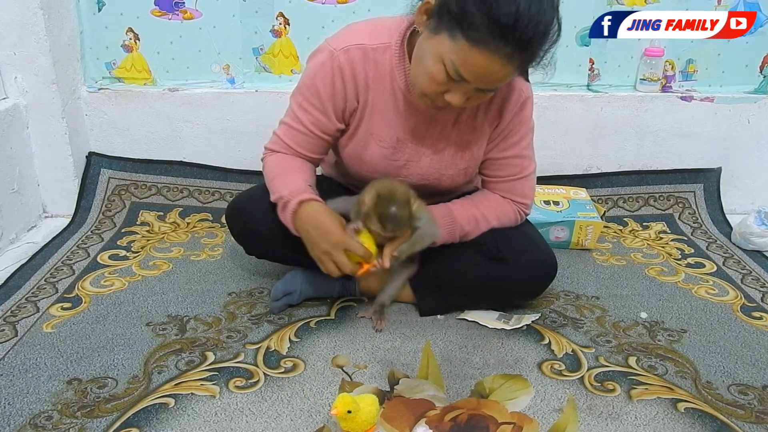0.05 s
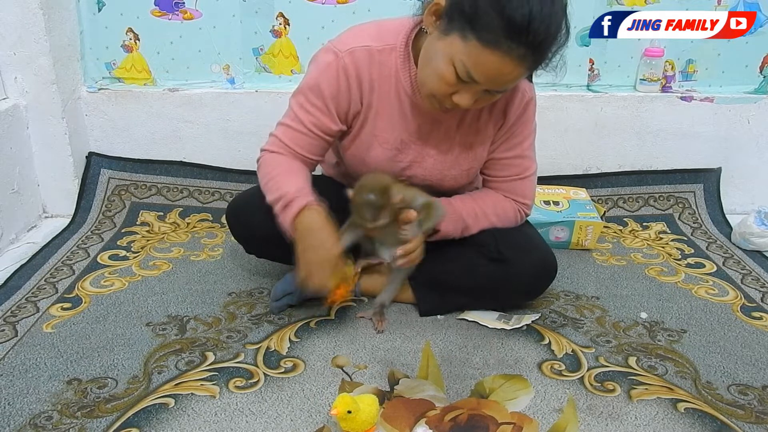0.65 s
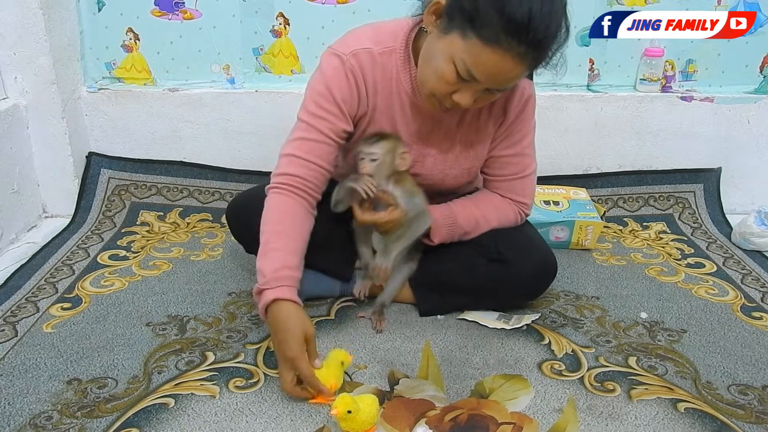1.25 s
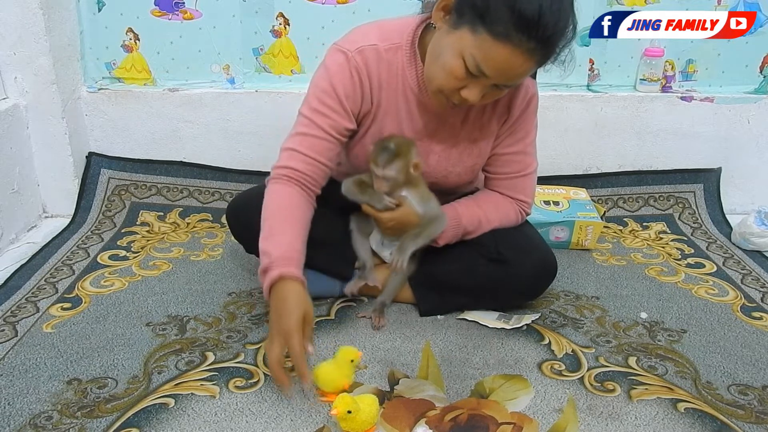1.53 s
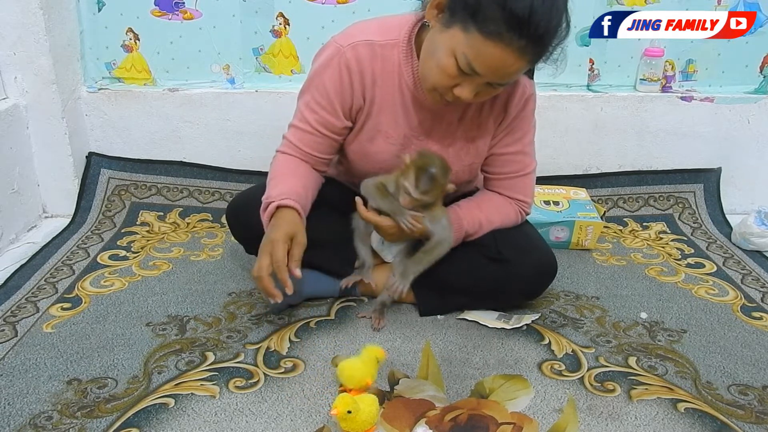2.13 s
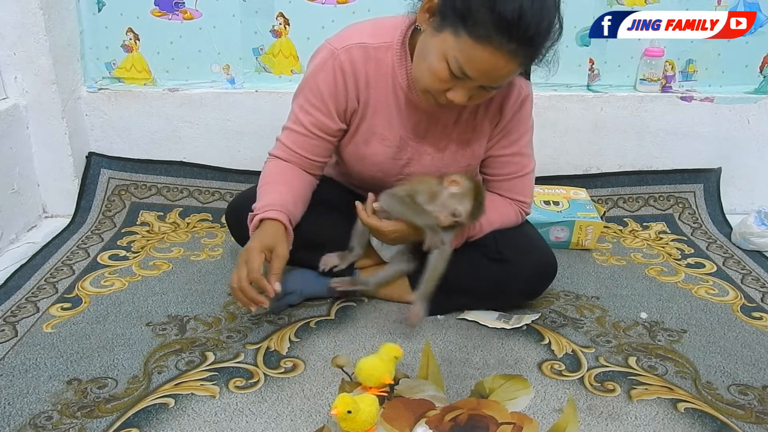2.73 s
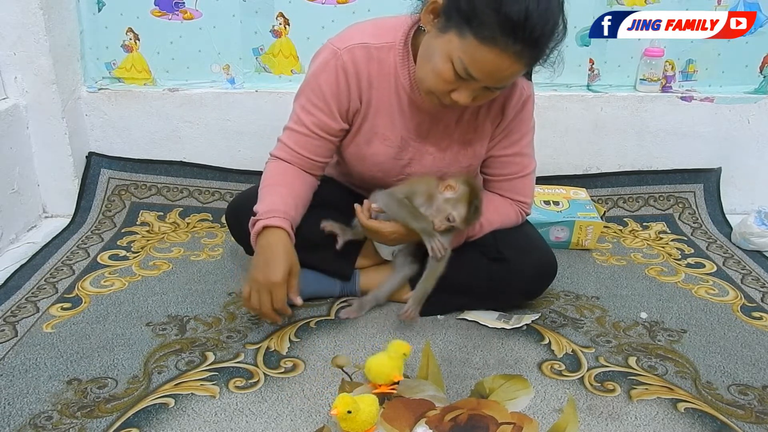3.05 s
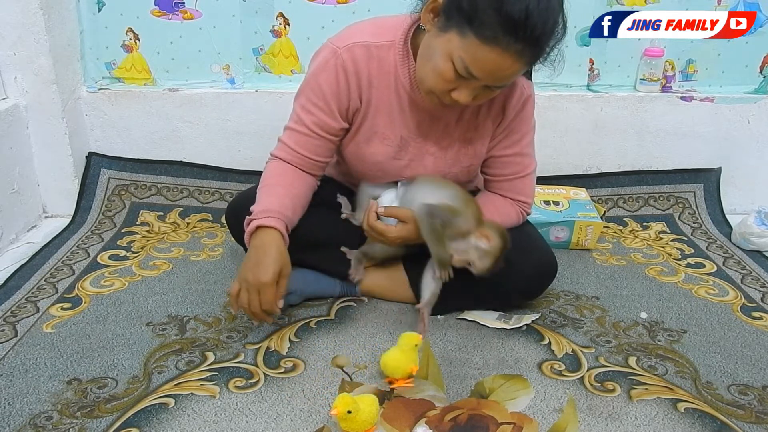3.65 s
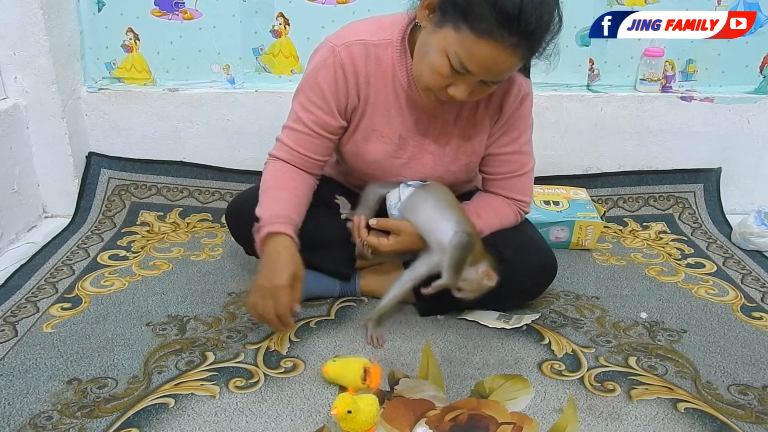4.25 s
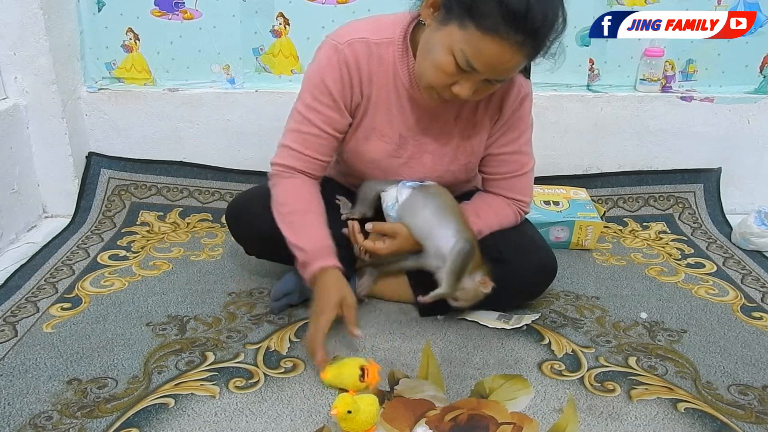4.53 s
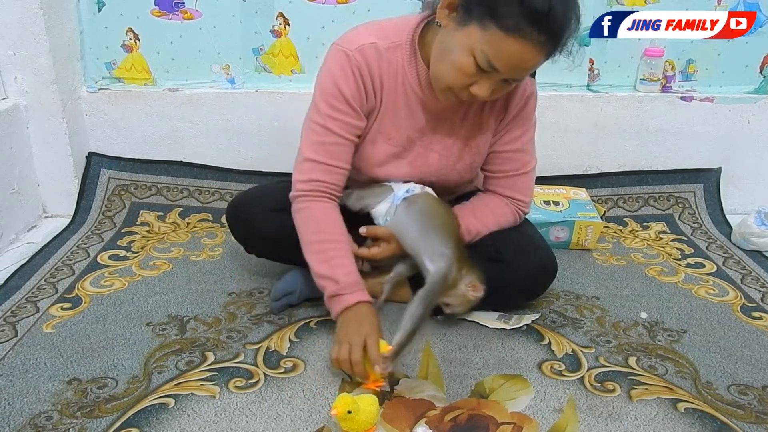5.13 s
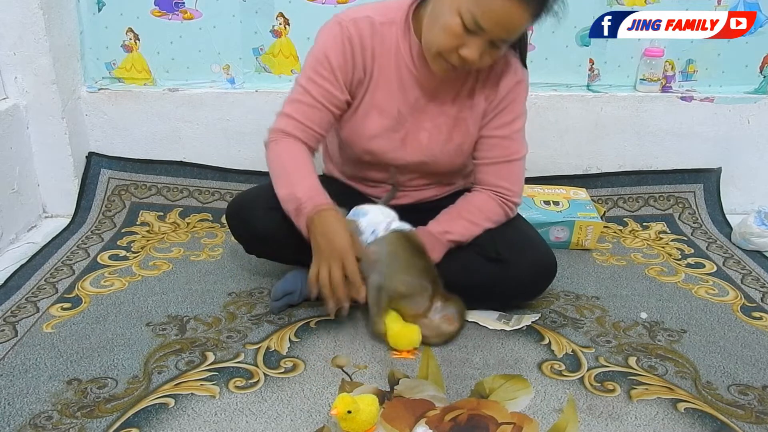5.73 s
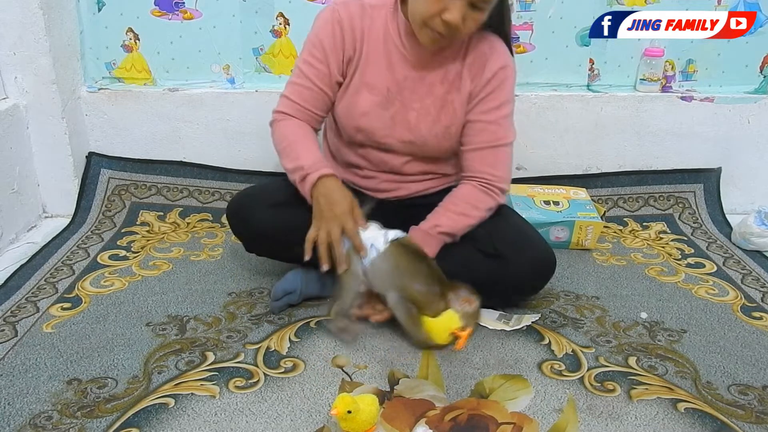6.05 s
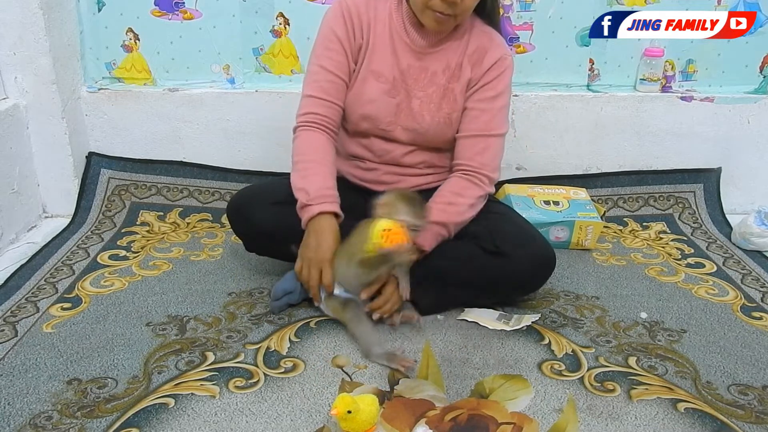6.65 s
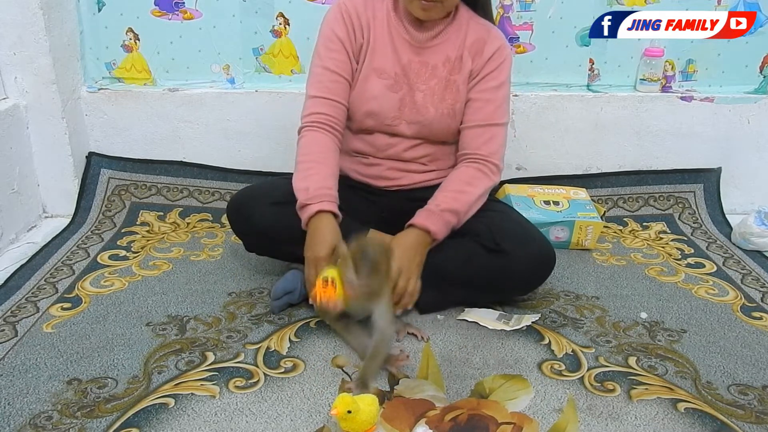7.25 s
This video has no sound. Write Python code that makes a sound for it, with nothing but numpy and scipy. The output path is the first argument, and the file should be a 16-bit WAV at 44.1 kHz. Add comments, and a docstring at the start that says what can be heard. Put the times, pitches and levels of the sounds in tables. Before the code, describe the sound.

A faint low rumble and hiss fill a small, hard-walled room throughout. In the first second, fingers tap lightly on a plastic wind-up chick and sleeves brush softly. One sharp snap comes at about 1.1 seconds, then two small knocks as the toy is set down. From 1.5 to 4 seconds it hops on the carpet with an even run of crisp double clicks, about six pairs a second, slightly left of centre, each ringing briefly in the room. It topples with a soft knock at about 4.1 seconds. After a brush of cloth, the handled toy lets out irregular single snaps from 5 to 6.1 seconds, followed by light knocks. A few faint hollow pops are scattered between 2 and 6.2 seconds. From 6.2 seconds clothes rustle in short strokes, with one loud snap at 7 seconds and a last small tap just after.

```python
"""Wind-up chick on a carpet

A plastic wind-up chick is set down and hops until it topples: twice a hop its spring snaps the legs
against the shell, and each impact sets toy and room ringing. Picked up and handled, it lets go
single snaps among small ticks, soft pops and the friction noise of clothes. A small hard-walled room
reflects every click, over a low rumble and faint hiss."""
import sys
import numpy as np
from scipy import signal
from scipy.fft import rfft, irfft, next_fast_len
from scipy.io import wavfile
from scipy.ndimage import uniform_filter1d, map_coordinates

SR = 44100
rng = np.random.default_rng(int(sys.argv[2]) if len(sys.argv) > 2 else 0)


def pcm_store(signal):
    """Save signal as 16-bit PCM."""
    levels = np.round(np.clip(np.atleast_2d(signal), -1, 1) * 32767)
    wavfile.write(sys.argv[1], SR, levels.astype(np.int16).T)


N = 329856
ROOM_SAMPLES = SR // 3


def amp(db):
    """Amplitude ratio of a level in decibels."""
    return 10 ** (np.asarray(db) / 20)


def unit(x):
    """Normalisation to rms 1."""
    return x / np.sqrt(np.mean(x ** 2) + 1e-20)


def along(points, hz):
    """Interpolation of (f/Hz, value) points on a logarithmic frequency axis."""
    f, values = np.transpose(points)
    return np.interp(np.log(hz + 1), np.log(f + 1), values)


def wobble(rate):
    """Smooth random modulation with rate knots a second."""
    return map_coordinates(rng.standard_normal(int(N * rate / SR) + 4), [np.arange(N) * rate / SR])


def filtered(x, response):
    """Linear filtering: the spectrum of x times a frequency response."""
    n = x.shape[-1]
    m = next_fast_len(n + 4096)
    return irfft(rfft(x, m) * response(np.fft.rfftfreq(m, 1 / SR)), m)[..., :n]


def add(out, s, x):
    """Superposition of x on out from time s."""
    part = out[:, max(round(s * SR), 0):][:, :x.shape[-1]]
    part += x[..., :part.shape[-1]]


# Width of the diffuse field: f/Hz, side level re mid/dB
SIDE_LEVEL = [(30, -30), (70, -16.5), (140, -8.5), (230, -4.5), (1200, -9.5), (2500, -7), (5000, -6),
              (8000, -0.5), (15000, 2)]

def diffuse(size):
    """A diffuse field of white noise: coherent at two points in the bass, unrelated in the treble."""
    def mid_and_side(hz):
        share = amp(along(SIDE_LEVEL, hz))
        return np.array([np.ones_like(hz), share]) / np.hypot(1, share)
    mid, side = filtered(rng.standard_normal((2, size)), mid_and_side)
    return np.array([mid + side, mid - side])


def coloured_noise(spectrum):
    """Spectral shaping of diffuse noise, at rms 1."""
    return unit(filtered(diffuse(N), lambda hz: amp(along(spectrum, hz))))


# Spectra of the room's rumble and hiss: f/Hz, relative level/dB
RUMBLE_SPECTRUM = [(20, -52), (36, -31), (44, -8), (52, 6.5), (63, -14.5), (78, 2.5), (92, -5.5),
                   (108, -14.5), (140, -24), (300, -35.5)]
HISS_SPECTRUM = [(100, -34), (160, -1.5), (400, -7.5), (900, -9), (2300, -10.5), (3700, -15), (4600, -12),
                 (7200, -11), (9000, -20), (15500, -44)]

def background(rumble_db=-69, hiss_db=-67.5):
    """Stationary noise: a low rumble and a faint hiss."""
    rumble = amp(rumble_db) * coloured_noise(RUMBLE_SPECTRUM)
    return rumble + amp(hiss_db) * coloured_noise(HISS_SPECTRUM)


# Reverberation time: f/Hz, T60/s
DECAY_TIMES = [(250, 0.17), (1000, 0.27), (2500, 0.24), (6500, 0.19), (10000, 0.19), (15000, 0.097)]
# Early reflections: delay/s, relative level/dB
ECHOES = [(.0026, -3), (.0055, -9.5), (.011, -5), (0.0126, -4.5), (.0152, -15.5), (0.0215, -10)]
# Direct sound at the two microphone ports: f/Hz, phase difference/rad
PORT_PHASE = [(3000, 0.24), (7200, -0.5), (8000, -1.95), (13000, -1.2), (15000, -1.5)]

def in_room(x, walls, tail_db, early_db=-6, build_s=0.014, smear_s=0.00076, steady_hz=2500):
    """Reverberation: direct sound, early reflections, then an exponentially decaying tail."""
    t = np.arange(ROOM_SAMPLES) / SR
    # small moves of the source change only the treble of the reflection pattern
    steady = lambda hz: 1 / np.hypot(1, hz / steady_hz)
    changing = filtered(diffuse(ROOM_SAMPLES), lambda hz: np.sqrt(1 - steady(hz) ** 2))
    hz, frames, pattern = signal.stft(filtered(walls, steady) + changing, SR, nperseg=128)
    decay = amp(-60 * frames / along(DECAY_TIMES, hz)[:, None])
    tail = signal.istft(pattern * decay, SR, nperseg=128)[1][:, :ROOM_SAMPLES]
    response = amp(tail_db) * unit(tail * np.where(t < build_s, amp(early_db), 1))  # thin at first
    scatter = diffuse(ROOM_SAMPLES)
    for delay, db in ECHOES:
        window = np.exp(-((t - delay - rng.normal(0, 0.00088)) / smear_s) ** 2)
        response += amp(db) * unit(scatter * window)
    direct = filtered(x, lambda hz: np.exp(.5j * along(PORT_PHASE, hz) * np.array([[1], [-1]])))
    reflected = signal.fftconvolve(x[None], response / np.sqrt(ROOM_SAMPLES), axes=1)
    return reflected + np.pad(direct, ((0, 0), (0, reflected.shape[1] - len(x))))


# Friction spectra of fibres and of heavy cloth: f/Hz, relative level/dB
FIBRE_SPECTRUM = [(300, -2), (1400, -19), (2500, -10), (3600, -5), (4500, -1.5), (6600, 4), (7500, 1),
                  (8500, -8.5), (10500, -20), (15000, -38)]
RUB_SPECTRUM = [(100, -25), (300, -12.5), (750, 0), (1500, 4.5), (2500, 5), (4000, -16), (10000, -36)]
# Sleeves and fur sliding over cloth: t/s, half length/s, relative hiss level/dB, relative rub level/dB
CLOTH_STROKES = [(0.562, 0.075, -61.5, -70.5), (1, 0.053, -65, -68.5), (4.83, 0.21, -66, -69.5),
                 (6.214, .11, -58.5, -79.5), (6.48, 0.064, -59.5, -66.5), (6.654, 0.12, -65, -77),
                 (6.873, 0.066, -61.5, -65), (7.088, 0.1, -62, -65), (7.427, 0.064, -71, -74)]

def clothes(rub_db=-1, grain_db=0.7):
    """Friction noise swells and fades: fibres hiss with an uneven grain, heavier cloth rubs dully."""
    t = np.arange(N) / SR
    hiss_power, rub_power = np.zeros((2, N))
    for s, half, bright_db, dull_db in CLOTH_STROKES:
        swell = np.exp(-((t - s) / half) ** 2)
        hiss_power += amp(bright_db) ** 2 * swell
        rub_power += amp(dull_db + rub_db) ** 2 * swell
    grain = unit(amp(grain_db * wobble(250) + 1.05 * wobble(35)))
    hiss = np.sqrt(hiss_power) * coloured_noise(FIBRE_SPECTRUM)
    rub = np.sqrt(rub_power) * coloured_noise(RUB_SPECTRUM)
    return grain * (hiss + rub)


# Soft hollow pops: t/s, relative level/dB, f/Hz
POP_TONES = [(2.085, -51.5, 300), (3.50, -57.5, 296), (4.262, -61.5, 287), (4.961, -52, 275),
             (5.431, -55.5, 272), (5.433, -60, 467), (6.173, -50.5, 448)]

def pops(level_db=2, t60=0.034, attack_s=0.0019):
    """Damped oscillation: a few cycles of one low tone, each from its own place in the room."""
    out, t = np.zeros((2, N)), np.arange(SR // 10) / SR
    for s, db, hz in POP_TONES:
        tone = np.sin(2 * np.pi * hz * t) * amp(-60 * t / t60) * (1 - np.exp(-t / attack_s))
        add(out, s, amp(db + level_db) * in_room(2 * tone, diffuse(ROOM_SAMPLES), tail_db=-2))
    return out


def resonance(hz, centre_hz, width_hz, db):
    """A Lorentzian resonance: its lift in dB above a flat response."""
    return 10 * np.log10(1 + amp(db) ** 2 / (1 + (2 * (hz - centre_hz) / width_hz) ** 2))


def shell_band(hz):
    """Radiation band of the hollow shell, as a weight from 1 to 0."""
    return np.interp(hz, [2800, 3800], [1, 0])


# Spectral envelope of the struck plastic: f/Hz, relative level/dB
PLASTIC_SPECTRUM = [(150, -29.5), (400, -14.5), (1000, -12.5), (2300, -7), (2800, -7.5), (3600, -13),
                    (4300, -7.5), (5200, -6), (6000, -1.5), (7300, -2), (8200, -10), (9500, -20),
                    (13300, -28), (15500, -48)]
# Steady ringing tones of the toy and room, heard in every click: f/Hz, bandwidth/Hz, strength/dB
STEADY_RINGS = [(674, 19, 3), (897, 7.6, 10.5), (1074, 48, 7.5), (1485, 43, 2.5), (1440, 20, -13),
                (2410, 17, 1), (4850, 37, -19), (6100, 110, -23), (6800, 57, 5.5), (10240, 180, 3)]

def strike(colour_db, contact_s, slip_db=-18, size=4096):
    """Impact excitation: a slip, then a brief chattering contact sets toy and room ringing."""
    t, hz = np.arange(size) / SR, np.fft.rfftfreq(size, 1 / SR)
    slip = amp(slip_db) * np.exp(-(t / contact_s) ** 2)
    blow = np.exp(-((t - 2 * contact_s) / contact_s) ** 4)
    chatter = rfft(rng.standard_normal(size) * (slip + blow))
    power = np.abs(uniform_filter1d(np.abs(chatter) ** 2, size=40))
    chatter /= np.sqrt(power + 1e-9)  # the contact itself is broadband
    steady_db = along(PLASTIC_SPECTRUM, hz) + sum(resonance(hz, *ring) for ring in STEADY_RINGS)
    cepstrum = irfft(np.log(amp(steady_db + colour_db(hz)) + 1e-6))
    causal = np.r_[1, np.full(size // 2 - 1, 2), np.zeros(size // 2)]
    minimum_phase = np.exp(rfft(cepstrum * causal))
    fade = np.minimum(1, 2 * (1 - t / t[-1])) ** 2
    return fade * irfft(chatter * minimum_phase)


# Knocks of fingers and carpet on the toy: t/s, relative level/dB, relative shell level/dB, shell f/Hz
KNOCKS = [(0.276, -47.5, -14, 1440), (0.6882, -48.5, -9, 1500), (1.2528, -51.5, -8.5, 3100),
          (1.288, -54, -21, 820), (4.125, -41.5, -8, 760), (4.156, -48, -13, 2150),
          (4.96, -47, -16.5, 2220), (5.434, -50.5, -11, 2200), (6.039, -45, -5.5, 1390),
          (6.173, -47.5, -4.5, 1420), (6.284, -45, -14.5, 2840), (6.315, -42.5, -11, 2280),
          (7.25, -47.5, -18, 1390)]

def handling(walls, level_db=21, shell_boost_db=7):
    """Soft impacts: longer contacts excite the same plastic."""
    out = np.zeros((2, N))
    for s, db, shell_db, shell_hz in KNOCKS:
        def colour(hz):
            band = (shell_db + shell_boost_db) * shell_band(hz)
            return band + resonance(hz, shell_hz, width_hz=440, db=13)
        knock = in_room(strike(colour, contact_s=0.00105), walls, tail_db=3)
        add(out, s - .001, amp(db + level_db) * knock)
    return out


USUAL_SNAP_DB = -29  # relative level of an ordinary snap

def snap(walls, db, modes, shell_db, crisp_db, crisp_slope=.55, hard_snap_db=-22.5):
    """Release of elastic energy: the spring snaps the legs against the shell, which resonates."""
    # up to a hard snap, the crack of the catch varies less than the body
    top_db = crisp_db - crisp_slope * (min(db, hard_snap_db) - USUAL_SNAP_DB)
    def colour(hz):
        bands = shell_db * shell_band(hz) + top_db * np.interp(hz, [7500, 9500], [0, 1])
        return bands + sum(resonance(hz, *mode) for mode in modes)
    return amp(db) * in_room(strike(colour, contact_s=0.000722), walls, tail_db=2, early_db=-6.5)


# Snaps in the hand: t/s, relative level/dB, shell level/dB, shell f/Hz, its strength/dB,
# frame f/Hz, its strength/dB, gear f/Hz
HELD_SNAPS = [(1.0786, -25.5, -8, 1980, 10, 4460, 9, 7060),
              (5.0297, -30, -6.5, 1990, 17.5, 6530, 9.5, 7700), (5.1403, -29, -4, 2120, 9.5, 4870, 3, 7540),
              (5.538, -30, -4, 1690, 11.5, 4400, 6, 7200), (5.676, -33, -2, 870, 3, 5200, 9, 7800),
              (5.7595, -29.5, -3.5, 744, 4.5, 5100, 5, 7300), (5.854, -28, -2, 553, 7, 5130, 5, 7780),
              (5.914, -29.5, -2.5, 740, 2.5, 5760, 6.5, 7500),
              (6.0696, -27, -3.5, 1350, 7.5, 5100, 8, 7900), (6.982, -22.5, -7.5, 1430, 4, 4690, 8, 7700)]

def held_clockwork(walls, level_db=21, crisp_db=4.5, width_hz=236, gear_width_hz=170, gear_db=6.5):
    """Loading by the hand: the grip shifts the resonances as the spring lets go single snaps."""
    out = np.zeros((2, N))
    for s, db, shell_db, shell_hz, shell_mode_db, frame_hz, frame_db, gear_hz in HELD_SNAPS:
        modes = [(shell_hz, width_hz, shell_mode_db), (frame_hz, width_hz, frame_db),
                 (gear_hz, gear_width_hz, gear_db)]
        add(out, s - .0003, amp(level_db) * snap(walls, db, modes, shell_db, crisp_db))
    return out


# Gear resonance, shifting as the toy turns: t/s, f/Hz
GEAR_PITCH = [(1.5, 7360), (2.4, 6890), (2.9, 7350), (4, 7640)]

def varied(modes, s, db, gear_width_hz=200, gear_db=3, growth=1.2, detune=0.018, scatter_db=3):
    """Modal excitation varies: stronger for a hard snap, and scattered in pitch and strength."""
    gear_mode = (np.interp(s, *np.transpose(GEAR_PITCH)), gear_width_hz, gear_db)
    extra_db = growth * (db - USUAL_SNAP_DB)
    return [(hz * (1 + detune * rng.normal()), width, strength + extra_db + scatter_db * rng.normal())
            for hz, width, strength in modes + [gear_mode]]


# Modes rung by the kick and by the return of the legs: f/Hz, bandwidth/Hz, relative strength/dB
KICK_MODES = [(1410, 390, 2), (2203, 170, 2), (4350, 1000, -1), (5780, 200, 4)]
RETURN_MODES = [(1890, 71, 2.5), (3300, 260, -0.5), (4277, 450, 3), (5400, 220, -8)]
# Radiation of the shell during the run: t/s, relative level/dB
SHELL_RADIATION = [(1.5, -1), (2.4, 0.5), (4, -2.5)]
# Hops: kick t/s, delay of the return/s, relative kick level/dB, relative return level/dB
HOP_IMPACTS = [(1.5005, .0461, -28.5, -28.5), (1.642, .0555, -29, -28), (1.7893, .0589, -29, -29),
               (1.9476, 0.06, -28.5, -27.5), (2.1101, .0617, -29, -29), (2.275, 0.062, -28.5, -29),
               (2.4393, 0.06, -30, -29.5), (2.603, .06, -29, -29.5), (2.7712, .0578, -30, -28.5),
               (2.9375, 0.056, -30, -29.5), (3.1046, .0554, -29.5, -30), (3.2684, 0.053, -29.5, -28),
               (3.4329, 0.053, -29, -27.5), (3.6061, 0.054, -29, -28.5), (3.7663, 0.058, -29, -29.5),
               (3.9322, 0.045, -29, -30)]

def hopping_clockwork(walls, level_db=20.5, crisp_db_per_s=0.5):
    """A nearly periodic train of impact pairs: the legs kick, then spring back."""
    out = np.zeros((2, N))
    for s, delay, kick_db, return_db in HOP_IMPACTS:
        shell_db = np.interp(s, *np.transpose(SHELL_RADIATION))
        rise_db = crisp_db_per_s * (s - HOP_IMPACTS[0][0])  # crisper as the spring unwinds
        modes = varied(KICK_MODES, s, kick_db)
        kick = snap(walls, kick_db, modes, shell_db - 2, crisp_db=4.5 + rise_db)
        modes = varied(RETURN_MODES, s, return_db)
        rebound = snap(walls, return_db, modes, shell_db - 3, crisp_db=4 + rise_db)
        add(out, s - .0003, amp(level_db) * kick)
        add(out, s + delay - .0003, amp(level_db) * rebound)
    return out


def scene():
    """Superposition: the toy, a little left of centre, sends all its clicks to the same walls."""
    walls = diffuse(ROOM_SAMPLES)
    toy = hopping_clockwork(walls) + held_clockwork(walls) + handling(walls)
    return (toy + clothes()) * amp([[.3], [-.3]]) + pops() + background()


def record(dry, cutoff_hz=15750):
    """Band limiting: an ideal low-pass filter."""
    return filtered(dry, lambda hz: hz < cutoff_hz)


dry = scene()
out = record(dry)
pcm_store(out)
```